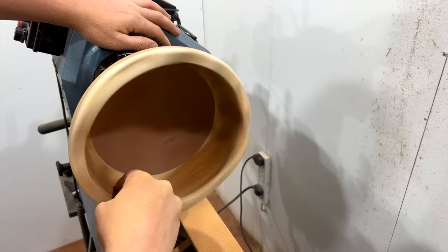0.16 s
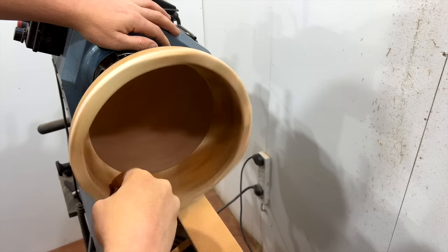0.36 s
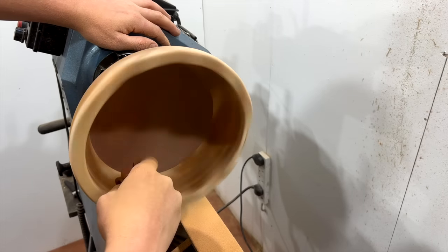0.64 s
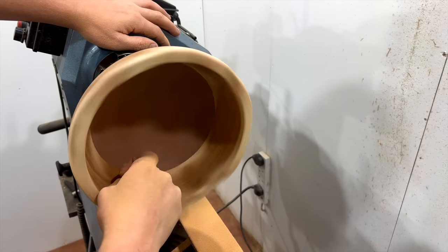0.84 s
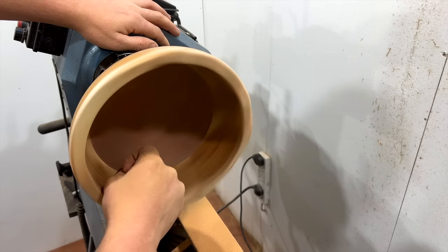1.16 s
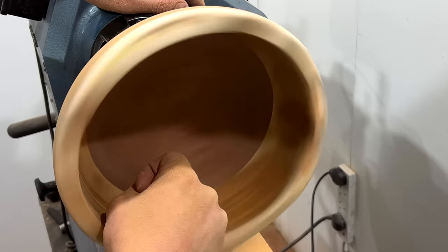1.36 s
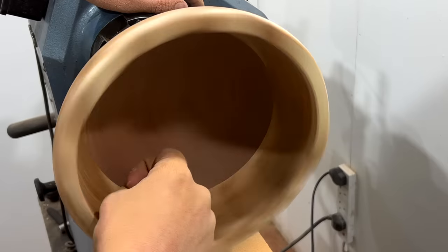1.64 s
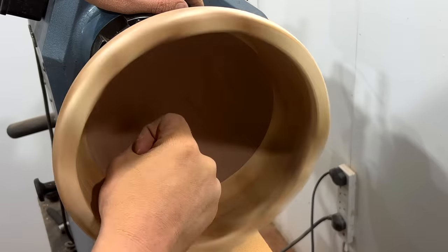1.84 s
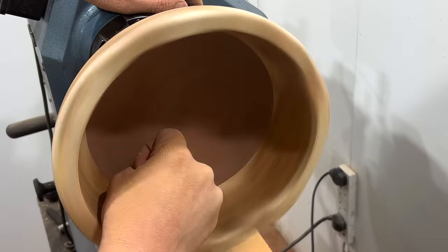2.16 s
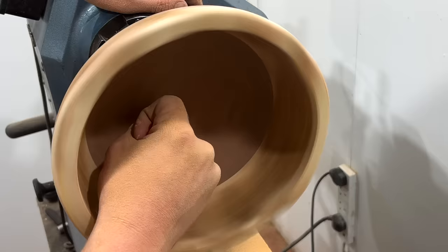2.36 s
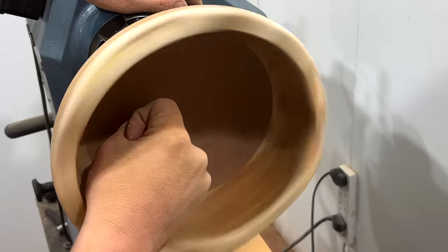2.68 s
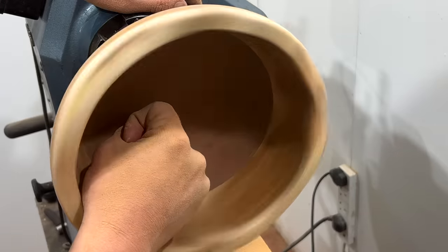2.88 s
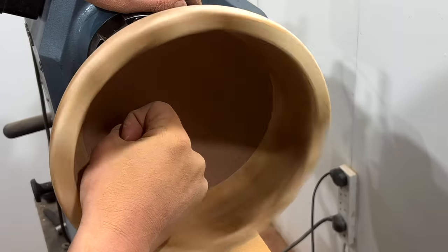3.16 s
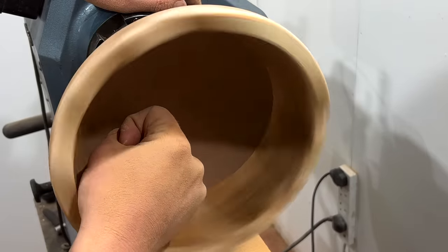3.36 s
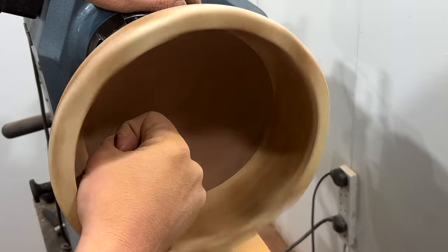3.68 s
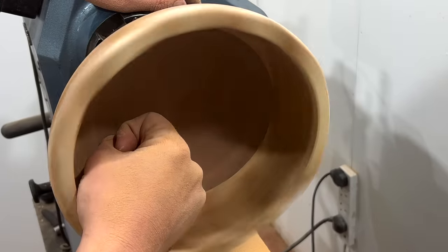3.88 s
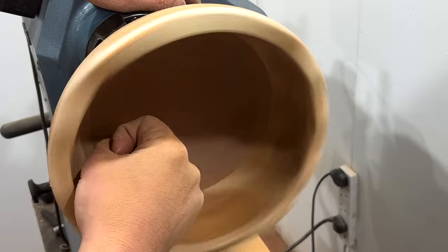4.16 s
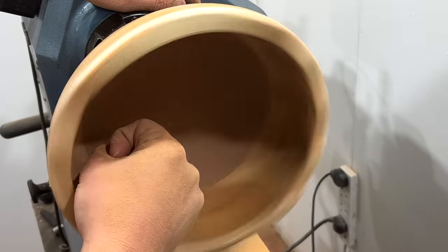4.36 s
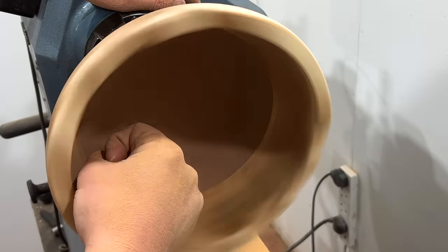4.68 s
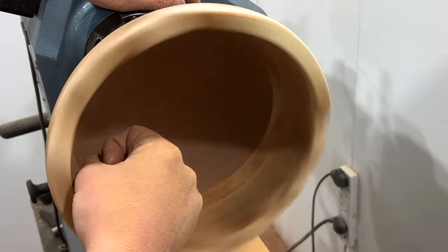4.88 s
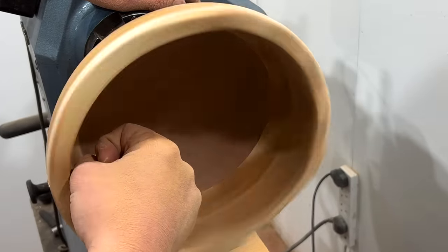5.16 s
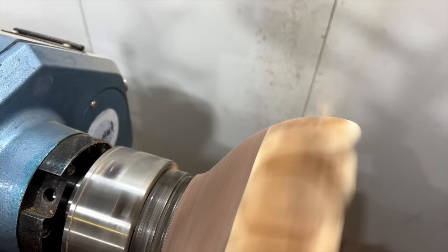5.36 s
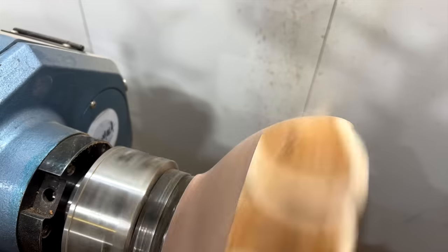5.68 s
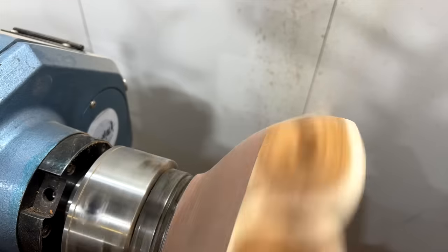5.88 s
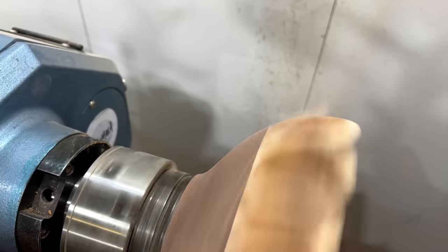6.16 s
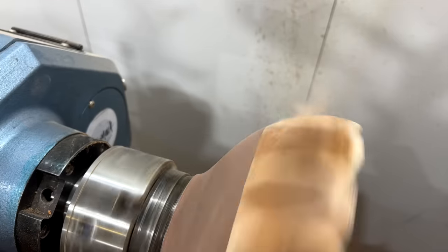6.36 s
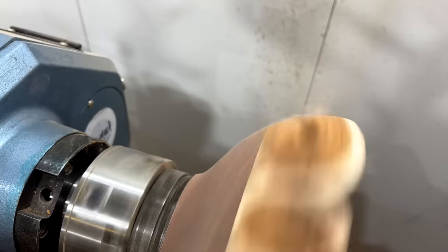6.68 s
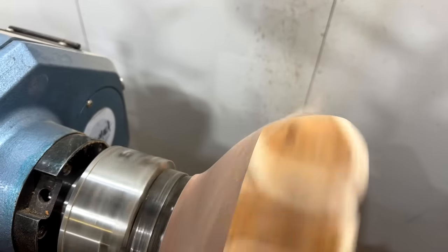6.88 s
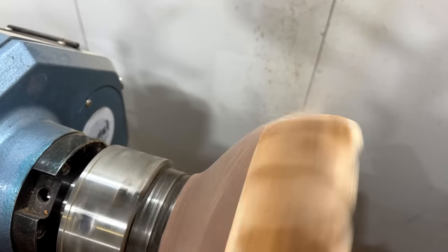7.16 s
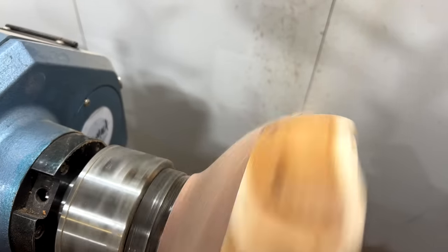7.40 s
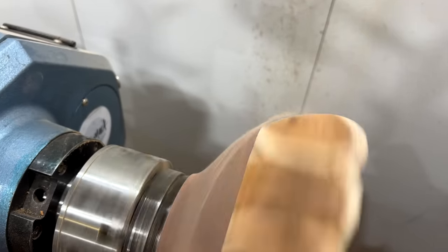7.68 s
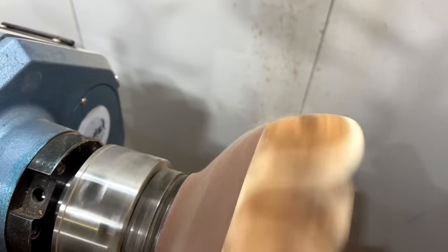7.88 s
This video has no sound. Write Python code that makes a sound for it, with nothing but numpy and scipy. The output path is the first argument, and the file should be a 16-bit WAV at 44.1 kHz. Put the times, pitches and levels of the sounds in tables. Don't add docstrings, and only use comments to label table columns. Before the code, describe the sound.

Sandpaper hisses loudly against a spinning wooden bowl, throbbing with every turn, over a low lathe hum that grows closer near the end.

```python
import sys
import numpy as np
from scipy import signal
from scipy.fft import rfft, irfft, next_fast_len
from scipy.io import wavfile
from scipy.ndimage import uniform_filter1d

SR = 44100
rng = np.random.default_rng(int(sys.argv[2]) if len(sys.argv) > 2 else 0)


def pcm_store(signal):
    levels = np.round(np.clip(np.atleast_2d(signal), -1, 1) * 32767)
    wavfile.write(sys.argv[1], SR, levels.astype(np.int16).T)


def invert_db(level):
    return 10 ** (np.asarray(level, dtype=float) / 20)


N = 354123
SIZE = next_fast_len(N)
T = np.arange(N) / SR
HZ = np.arange(SIZE // 2 + 1) * SR / SIZE
BLEND_S = (4.83, 5.52)


def columns(table, x=T):
    first, *rest = np.transpose(table)
    return [np.interp(x, first, column) for column in rest]


def held(table):
    rows = np.array(table)
    current = np.searchsorted(rows[:, 0], T, side="right") - 1
    return rows[current, 1:].T


def bumps(events):
    return sum(db * np.exp(-((T - s) / half) ** 2) for s, db, half in events)


def walk(rate):
    hold = 8
    steps = int(hold * rate * N / SR) + 2
    levels = np.repeat(rng.standard_normal(steps // hold + 1), hold)
    smooth = uniform_filter1d(uniform_filter1d(levels, hold), hold)
    return np.interp(T * rate * hold, np.arange(len(smooth)), smooth / smooth.std())


def ring(hz, width):
    return 1 / (1 + (2 * (HZ - hz) / width) ** 2)


def above(hz, order):
    return 1 / (1 + (hz / (HZ + 1)) ** order)


def ports(pan_db, lead, likeness):
    one, other = rfft(rng.standard_normal((2, SIZE)))
    likeness = np.clip(likeness, 0, 1)
    right = likeness * np.exp(-1j * lead) * one + np.sqrt(1 - likeness ** 2) * other
    return np.array([one * invert_db(pan_db / 2), right * invert_db(-pan_db / 2)])


def shaped(spectra, gain, lo=0, hi=np.inf):
    heard = spectra.mean(axis=0)[(HZ > lo) & (HZ < hi)]
    if not lo:
        heard = heard * gain[1:]
    rms = np.sqrt(2 * np.sum(np.abs(heard) ** 2)) / SIZE
    return irfft(spectra * gain, SIZE)[:, :N] / rms


# t/s, high spot level/dB, its angle/rad, end grain level/dB, its angle/rad
THROB = [
    (0, .75, -1.1, .4, 1.2),
    (.78, 2.6, -2.75, .35, -2.8),
    (1.62, .6, .3, 1.2, -.7),
    (2.4, .4, .4, 1.15, .7),
    (5.3, 2.2, 1.92, .85, .66),
]
# t/s, turn rate f/Hz
SPINDLE = [
    (0, 15.1),
    (2.4, 15.17),
    (5.2, 15.03),
]


def spots():
    once_db, once, twice_db, twice = held(THROB)
    turn = np.exp(2j * np.pi * np.cumsum(held(SPINDLE)[0]) / SR)

    def glide(arrow):
        size = int(0.15 * SR)
        return uniform_filter1d(arrow.real, size) + 1j * uniform_filter1d(arrow.imag, size)

    high_spot = glide(once_db * np.exp(1j * once)) * turn
    end_grain = glide(twice_db * np.exp(1j * twice)) * turn ** 2
    return high_spot, end_grain


# t/s, hiss level/dB, bite level/dB, dust level/dB
SANDING = [(0, -34, -4.5, 1.5), (.4, -34.5, -5, 2.5), (.7, -32.5, -3, -3), (.84, -25.3, 5, -5),
           (1.1, -25, 0.5, 0), (1.3, -24, -2.5, -2), (1.5, -26, -.5, -2.5), (1.8, -25, -1.5, -6.5),
           (2.28, -25.5, -2, -5), (2.38, -32.5, 0, -5.5), (2.75, -29.5, .8, -3.5), (3.5, -28, 2.5, -4.5),
           (4.7, -28, 0.5, -3.5), (5.15, -31, -0.5, 0.5), (5.55, -29, -2, 4), (6.4, -28, 0.3, 3.5),
           (7.3, -28, 0.5, 1.5), (8.03, -31, 4, 1)]
# t/s, level/dB, half length/s
LIFTS = [
    (1.6, -4.5, 0.044),
    (1.94, -6, 0.055),
]
# t/s, distance from the axis (0-1), cupped hollow level/dB
HAND = [
    (0, 1, -69),
    (.8, 0.46, -62),
    (1.55, 0.43, -70),
    (1.8, 0.2, -50.5),
    (2.5, 0, -57.5),
    (2.8, 0.14, -52.5),
    (3.7, .65, -53.5),
    (5.1, 1.05, -56.5),
    (5.4, 0.94, -82),
    (8.03, 0.71, -80),
]
# f/Hz, level/dB per Hz, left minus right level/dB, left leads phase/rad, likeness (0-1)
OPEN_SIDE = [(2100.0, -18.5, 2.22, 1.44, 0.15), (2450.0, -10.1, 1.1, 1.64, 0.52),
             (3600.0, -6.7, 3.87, 1.86, 0.37), (4800.0, -0.8, 4.44, -0.04, 0.69),
             (6000.0, -2.2, 3.33, -0.62, 0.45), (7100.0, -2.0, 0.24, 0.08, 0.91),
             (8400.0, -1.1, 3.26, -0.89, 0.54), (9050.0, -4.6, 0.0, -2.85, 0.965),
             (10870, -5.2, 0.0, -3.42, 0.965), (11550.0, -2.8, 0.11, -4.54, 0.67),
             (12350.0, -4.4, 0.0, -5.9, 0.92), (14750.0, -8.8, 0.0, -6.7, 0.92),
             (15200.0, -9.0, 0.0, -8.7, 0.75), (15700.0, -10.5, 0.0, -8.9, 0.72)]
# f/Hz, level/dB per Hz, left minus right level/dB, left leads phase/rad, likeness (0-1)
BEHIND = [(2100.0, -19.8, 1.92, 0.41, 0.46), (2450.0, -12.6, -0.01, 1.1, 0.57),
          (3600.0, -9.5, 3.91, 1.88, 0.2), (4800.0, -1.7, 9.48, 1.53, 0.28),
          (6000.0, -4.9, 5.69, 2.9, 0.24), (7000.0, -6.3, 2.57, -0.69, 0.52),
          (8400.0, -1.1, 2.02, -1.24, 0.74), (9050.0, -3.6, 0.0, -2.85, 0.965),
          (10870, -4.6, 0.0, -3.42, 0.965), (11550.0, -1.2, -0.02, -4.7, 0.72),
          (12750.0, -3.2, 0.0, -5.9, 0.965), (14200.0, -1.0, 0.0, -6.7, 0.965),
          (15000.0, -0.2, 0.26, -7.64, 0.68), (15850.0, -1.2, -0.27, -8.76, 0.72)]
# f/Hz, width f/Hz, level from the open side/dB, level from behind/dB
WALL = [(2462, 120, 7, 7.5), (2673, 114, -4.5, -6), (2886, 94, 6.5, 8.5), (2980, 92, -3, -12.5),
        (3120, 180, 1.5, 6.5), (3450, 87, 2.5, -1), (4110, 180, -4, 5.5), (4387, 225, -5, -9),
        (4460, 74, 5.5, 6), (4960, 77, 1.5, -6), (5320, 81, 4.5, 3.5), (5466, 120, -4, -10),
        (6030, 120, 0, -3), (8880, 480, 3, 3.5)]


def hiss(view, side, dust_throb):
    level_db, bite_db, dust_db = columns(SANDING)
    scrape_db = -20.5 + 7.5 * columns(HAND)[0]
    spots_db = sum(spots())
    tone_db, pan_db, lead, likeness = columns(view, HZ)
    wall_db = sum(row[side] * ring(row[0], row[1]) for row in WALL)
    color = invert_db(tone_db + wall_db) * above(1980, order=12) * (HZ < 15850)
    grains = ports(pan_db, lead, likeness) * color
    catch_db = 0.46 * walk(50) + 0.48 * walk(120)

    def patch(lo_hz, hi_hz, span, depth):
        lag = 0.5 * walk(5)
        throb_db = (spots_db * np.exp(1j * lag)).real
        flicker_db = 0.72 * walk(8) + 0.53 * walk(30)
        swell_db = depth * (1.18 * throb_db + catch_db) + flicker_db
        band = above(lo_hz, order=20) - above(hi_hz, order=20)
        return shaped(grains, band, *span) * invert_db(swell_db)

    def patches(edges, span, depth):
        return sum(patch(lo, hi, span, depth) * invert_db(lean * bite_db) for lo, hi, lean in edges)

    scrape = patch(1, 2700, (2200, 3400), .5) + patch(2700, 3500, (2200, 3400), .7)
    body_edges = [(3500, 4400, -.5), (4400, 5500, -.5), (5500, 7000, .1), (7000, 10000, .5)]  # Hz, Hz, lean
    body = patches(body_edges, (3500, 8500), 1)
    dust = patches([(10000, 13300, .2), (13300, 20000, -.5)], (11500, 15500), dust_throb)
    mix = invert_db(scrape_db) * scrape + body + invert_db(dust_db) * dust
    return invert_db(level_db + bumps(LIFTS)) * mix


def rim():
    once = spots()[0]
    mode = shaped(ports(2., 1.0, 0.56), ring(4080, 92.0))
    pressure_db = columns(SANDING)[0] + bumps(LIFTS)
    throb_db = 6.24 * np.abs(once) + 1.0 * once.real
    return mode * invert_db(pressure_db - 26.0 + throb_db)


def cavity():
    radius, db = columns(HAND)
    note_hz = 1156 + 200 * radius
    slow = shaped(ports(1.9, .2, 0.57), ring(0, 290.0))
    return np.sqrt(2) * slow * np.cos(2 * np.pi * np.cumsum(note_hz) / SR) * invert_db(db)


# t/s, f/Hz, level/dB, time to fall 60 dB/s
KNOCK = [
    (0.829, 382, -32, 0.16),
    (0.844, 221, -32, 0.32),
]


def knock():
    out = 0
    for s, hz, db, t60 in KNOCK:
        age = np.maximum(T - s, 0)
        soft_start = 1 - np.exp(-age / 0.0062)
        out = out + invert_db(db - 60 * age / t60) * soft_start * np.sin(2 * np.pi * hz * age)
    return out


# t/s, level/dB
TICKS = [
    (.0694, -14),
    (.1335, -12),
    (.2635, -17),
]


def ticks():
    out = 0
    for s, db in TICKS:
        age = T - s
        fade = invert_db(db - 60 * np.abs(age) / .0012)
        out = out + (age >= 0) * fade * np.cos(2 * np.pi * 13500 * age)
    return out


# f/Hz, level/dB, left minus right level/dB, left leads phase/rad
HUM = [(111.0, -47.4, -0.4, -0.1), (123.3, -50.5, 1.3, 0.4), (147.7, -46.3, 6.5, 0.7),
       (160.0, -46.6, 2.2, -0.3), (172.1, -48.5, -1.1, 0.1), (184.4, -55.2, 5.7, -0.1),
       (222.9, -45.4, 2.1, 0.3), (234.3, -40.8, 1.3, 0.2), (246.3, -48.0, -9.2, 0.7),
       (258.7, -49.5, 0.5, 0.6), (271.0, -52.1, 3.8, 0.5), (283.3, -50.5, 3.0, -0.4),
       (293.9, -55.2, 3.9, 0.2), (318.3, -49.4, 2.0, -0.9), (330.4, -53.3, 2.3, -1.1),
       (342.7, -54.1, -10.8, 2.1), (355.0, -45.1, 4.5, 1.3), (367.2, -47.6, 2.5, 0.8),
       (379.4, -54.5, -2.1, 0.6), (441.4, -60.4, 1.0, 0.4), (453.7, -56.4, -6.3, 0.5),
       (743.1, -54.9, -1.4, -0.6)]
# t/s, level/dB, half length/s
SWELLS = [
    (5.55, 9.5, .2),
    (6.5, 10, 0.31),
    (7.4, 10.5, 0.24),
    (8.06, 9, 0.086),
]


def headstock():
    beating, steady = 0, 0
    for hz, db, pan_db, lead in HUM:
        middle = 135 < hz < 305
        phase = 2 * np.pi * (hz * T + rng.random()) + (1.0 if middle else .3) * walk(2.5)
        level = invert_db(db + (2.5 if middle else .8) * walk(3.2))
        left = invert_db(pan_db / 2) * np.cos(phase + lead)
        right = invert_db(-pan_db / 2) * np.cos(phase)
        line = level * np.array([left, right])
        if middle:
            beating = beating + line
        else:
            steady = steady + line
    rattle_modes = ring(142, 31.0) + 2.7 * ring(226, 28.0) + 0.33 * ring(280, 35.)
    rattle = shaped(ports(1.3, 0.35, 0.99), rattle_modes)
    shake_db = -3 + 4.2 * np.cos(2 * np.pi * 24.5 * T)
    beating = beating / beating.mean(axis=0).std() + invert_db(shake_db) * rattle
    skirt_modes = ring(98, 12.) + ring(350, 40.) + 1.2 * ring(444, 48.0)
    skirts = shaped(ports(1.7, 0.36, 0.83), skirt_modes)
    steady = 1.43 * steady + invert_db(-51.0) * skirts
    return invert_db(-41.5 + bumps(SWELLS)) * beating + invert_db(-0.2) * steady


def frame_mode(hz, width, lead):
    narrow = width < 20
    phase = 2 * np.pi * hz * T + 1.18 * walk(width / 2)
    line = np.cos(phase + np.array([[lead], [0]])) * invert_db(1.0 * walk(4.1)) * narrow
    noise = shaped(ports(-.3, lead, 0.91), ring(hz, width))
    return line + (.6 if narrow else 1) * noise


# f/Hz, width f/Hz, level/dB, left leads phase/rad
FRAME = [(143, 5.92, 0, -0.042), (221.2, 8.66, 1, 0.12), (240, 44, 1, .1), (334.3, 8.5, -5, 0.083),
         (378, 18, -8.5, -.2), (443.7, 17, -2.5, -0.12), (515, 8.1, -20, .1), (578, 11.5, -10, .1)]
# t/s, frame and air level/dB, bearing whine level/dB
LATHE = [(0, -0.5, -49.5), (.5, 0, -48.5), (.82, .5, -44), (1.1, -1, -49.5), (1.6, -3, -55.5),
         (2.44, -4.5, -66), (4.1, -4.5, -61.5), (4.5, -3.5, -53.5), (5.0, -3.5, -56.5), (5.6, -3, -53.5),
         (8.03, -3, -59.5)]


def lathe(far):
    open_db, bearing_db = columns(LATHE)
    frame = sum(invert_db(db) * frame_mode(hz, width, lead) for hz, width, db, lead in FRAME)
    opposed = np.array([[1], [-1]])
    slot = invert_db(-59.5) * shaped(ports(-1.6, 0.091, 1.0), ring(745, 5.6)) * opposed
    bearing = shaped(ports(-0.5, 0.92, 0.99), ring(957.0, 63.0))
    rough = shaped(ports(0, 1., 0.35), ring(980, 154.0))
    bearing = bearing + (1.3 - far) * invert_db(-2.5) * rough
    housing = invert_db(-61.5) * shaped(ports(1.5, 1., 0.46), ring(1700, 70.0))
    across_bowl = far * (invert_db(-55.5 + open_db) * frame + slot)
    return housing + across_bowl + invert_db(bearing_db + 1.8 * walk(7)) * bearing


# f/Hz, level/dB per Hz
SHOP = [(12, -44), (20, -15), (138, -4.5), (235, -7.5), (383, -9.5), (451, -4.5), (766, -13), (1250, -7),
        (2000, -7), (2600, -6.5), (3380, -33), (5720, -120)]
# t/s, level/dB, half length/s
GUST = [
    (1.8, 7, 0.23),
]


def shop():
    open_db = columns(LATHE)[0]
    air_db = -58 + open_db
    rumble_db = -60.5 + .7 * open_db + bumps(GUST) + 1.5 * walk(3.07)
    lead = 0.25 * above(500, order=2)
    likeness = .97 - 0.8 * above(420, order=2)
    noise = ports(0.55, lead, likeness) * invert_db(columns(SHOP, HZ)[0]) * (HZ < 2600)
    over_bass = above(98, order=8)
    air = shaped(noise, over_bass, lo=507, hi=787)
    rumble = shaped(noise, 1 - over_bass, lo=20, hi=87)
    return invert_db(air_db) * air + invert_db(rumble_db) * rumble


def scene():
    angle = np.interp(T, BLEND_S, [0, np.pi / 2])
    far, near = np.cos(angle), np.sin(angle)
    front = hiss(OPEN_SIDE, side=2, dust_throb=.9) + rim()
    back = hiss(BEHIND, side=3, dust_throb=1.25)
    sanding = far * front + near * back + cavity()
    machine = np.interp(T, BLEND_S, [0, 1]) * headstock() + lathe(far)
    return sanding + knock() + ticks() + machine + shop()


def top_cut(x):
    return signal.sosfilt(signal.butter(12, 16220, fs=SR, output="sos"), x)


def record(dry):
    return top_cut(dry)


dry = scene()
out = record(dry)
pcm_store(out)
```